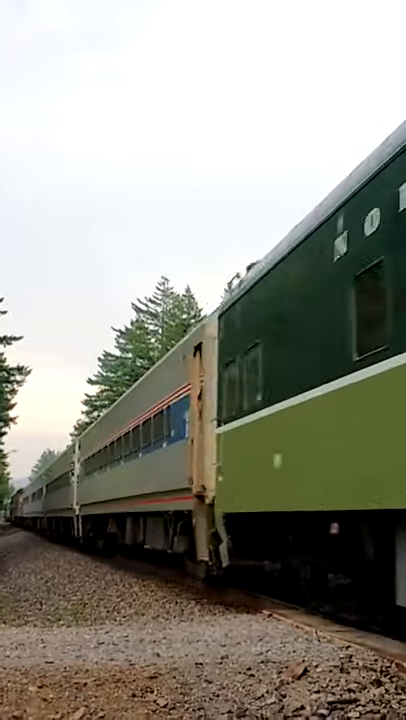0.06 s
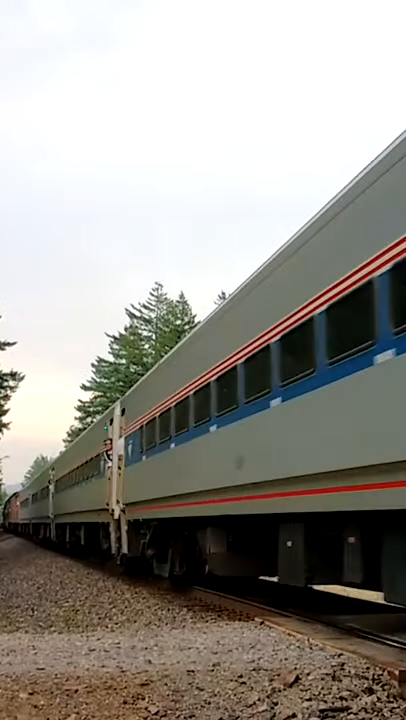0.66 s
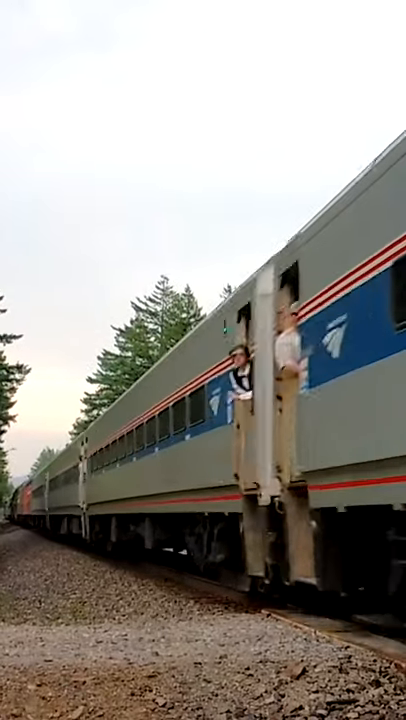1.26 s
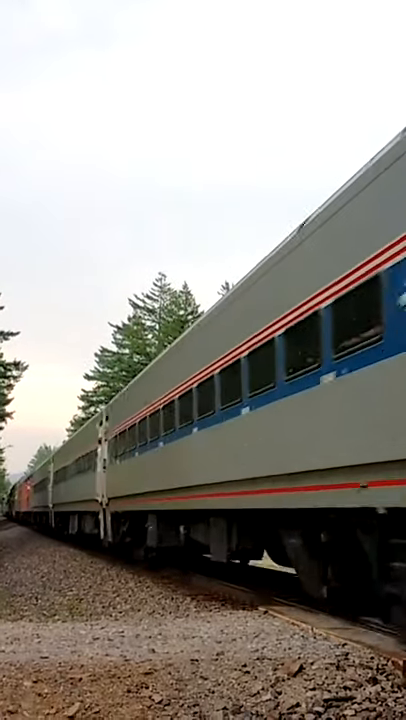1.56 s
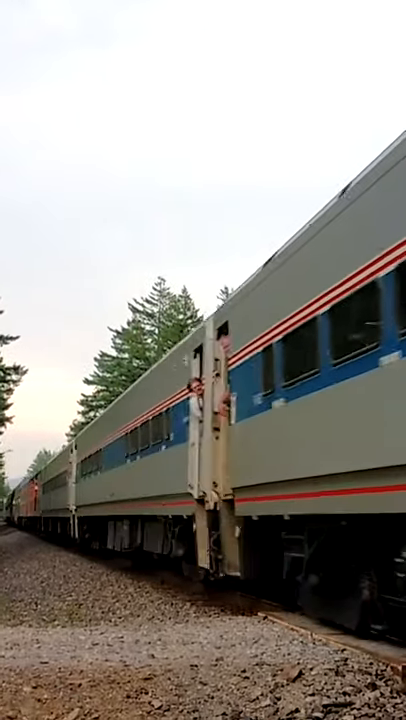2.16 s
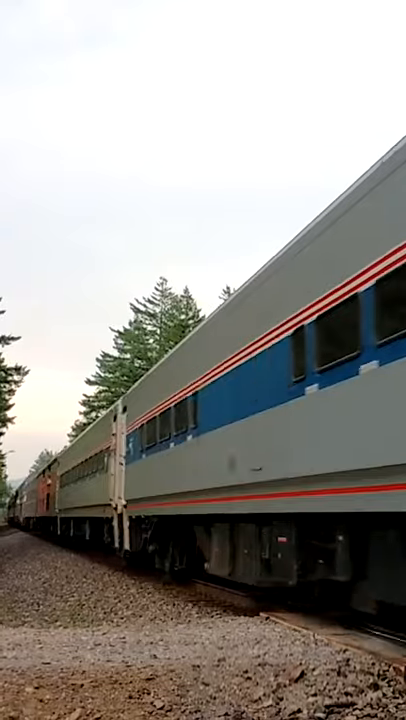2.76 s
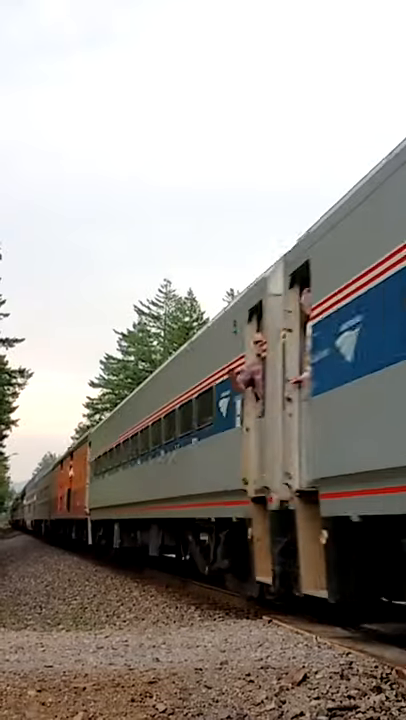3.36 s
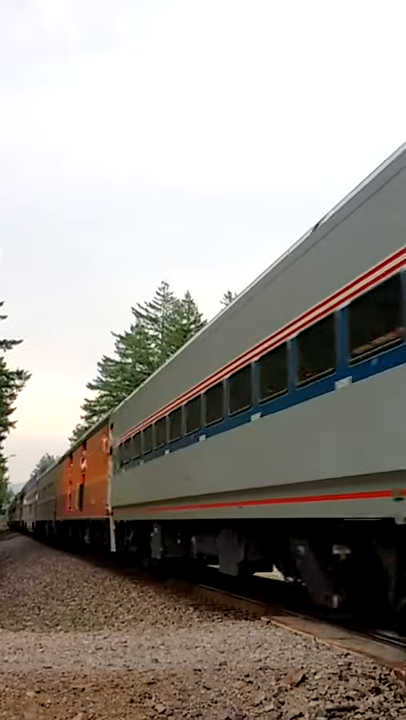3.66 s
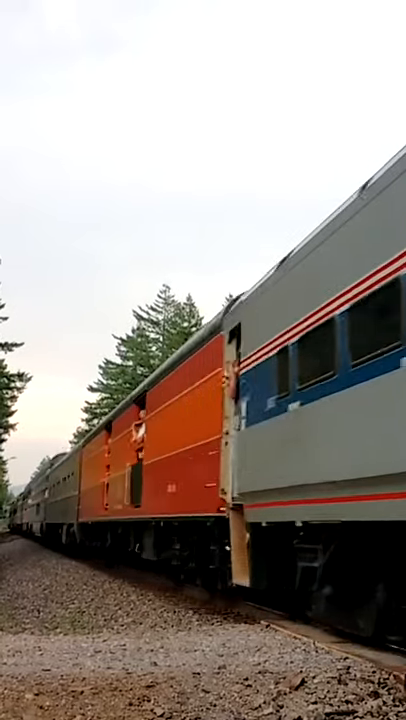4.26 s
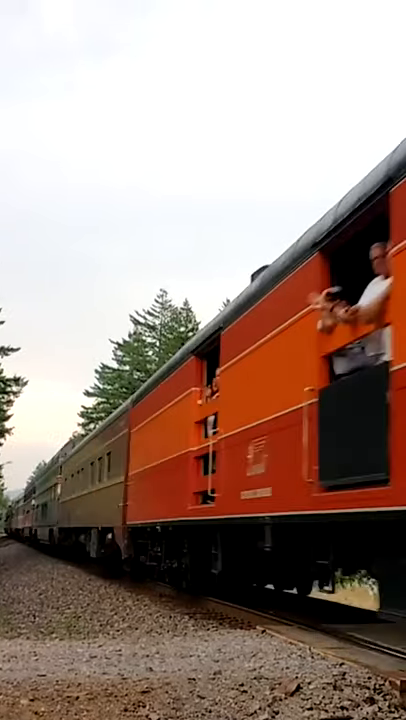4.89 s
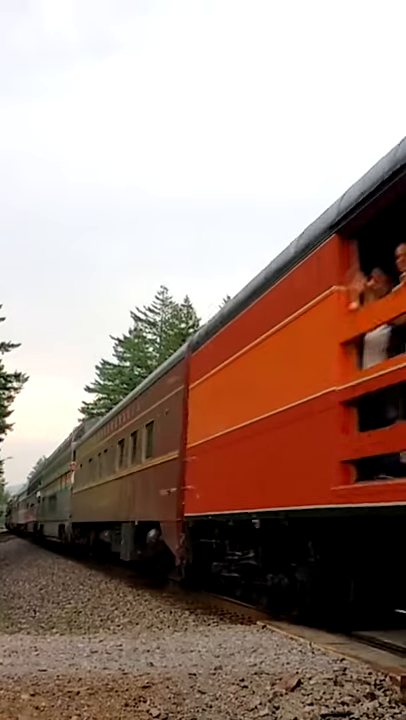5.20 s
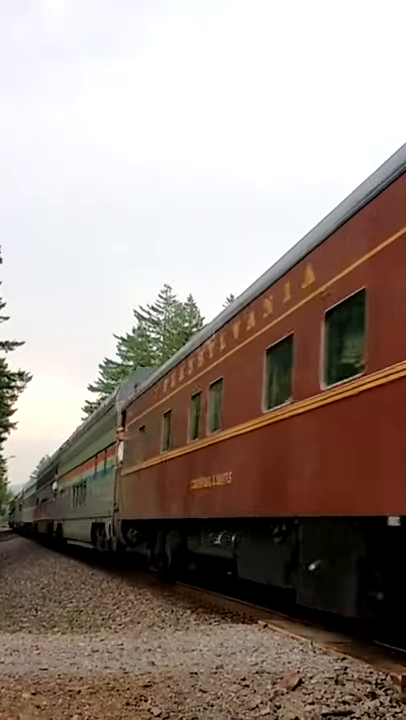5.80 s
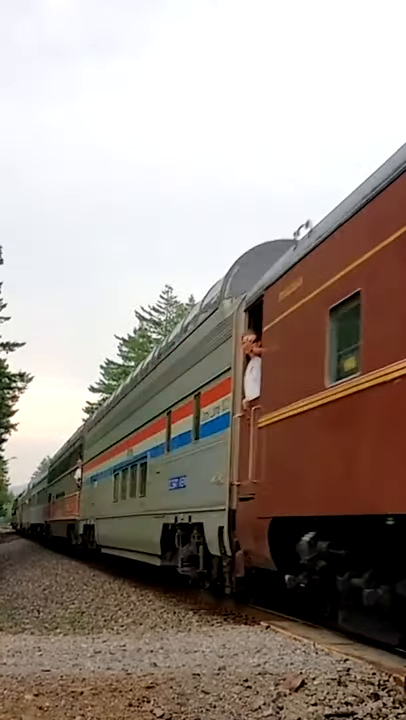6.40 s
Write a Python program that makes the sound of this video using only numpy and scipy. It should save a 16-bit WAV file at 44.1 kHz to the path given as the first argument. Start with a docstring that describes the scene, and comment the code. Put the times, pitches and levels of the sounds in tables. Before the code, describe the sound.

A passenger train rolls past at speed, its wheels rumbling, hissing and clacking over rail joints.

```python
"""Beside a railway track in the open air, a passenger train rolls past a few metres away, at speed.
Rough steel wheels on the rails make a rumble, a roar and a ringing hiss. Axle after axle drops over
the rail joints, thumping bogies and sleepers while loose gear rattles. Flanges squeak, rough treads
grind by and one dry tock sounds under a car. A phone's narrow pair of microphone ports hears it all."""
import sys
import numpy as np
from scipy import signal
from scipy.fft import rfft, irfft, next_fast_len
from scipy.io import wavfile
from scipy.ndimage import uniform_filter1d

SR = 44100
rng = np.random.default_rng(int(sys.argv[2]) if len(sys.argv) > 2 else 0)


def materialize(psi):
    """Save the field psi as 16-bit PCM at rate SR to the path in sys.argv[1].

    A 1-D psi becomes a single channel; in a 2-D psi each row is a channel.
    """
    bounded = np.clip(np.atleast_2d(psi).T, -1, 1)
    quanta = np.round(bounded * 32767).astype(np.int16)
    wavfile.write(sys.argv[1], SR, quanta)


N = 284004
TIME = np.arange(N) / SR


# Fader moves before trims and swells, up under rougher wheels: time_s, rumble_db, roar_db, hiss_db
ROLLING_FADERS = [(0.0, -27.5, -26, -40), (0.21, -27, -18, -35), (0.43, -27.5, -18, -39.5),
                  (1.0, -25, -26, -38), (1.332, -29, -27, -40), (1.5, -30, -26.5, -38.5),
                  (1.791, -26, -26, -38.5), (2.09, -27.5, -28.5, -41.5), (2.45, -27.5, -24.5, -37),
                  (2.76, -25, -24.5, -40.5), (3.13, -25.5, -29.5, -41.5), (3.5, -28, -23.5, -36.5),
                  (3.85, -31.5, -31, -43), (4.18, -29.5, -30.5, -41.5), (4.42, -28.5, -27.5, -39.5),
                  (4.6, -28.5, -25, -39), (4.979, -25.5, -20.5, -41), (5.08, -33, -26.5, -44.5),
                  (5.28, -28, -25, -40.5), (5.45, -25, -20, -35.5), (5.57, -26.5, -19, -36),
                  (5.68, -24.5, -19.5, -39), (5.87, -26, -18, -36.5), (6.2, -29.5, -23, -36),
                  (6.44, -30, -26.5, -34)]
def rolling(shake):
    """Wheel and rail roughness drives four layers; rumble and hiss swell with every bogie."""
    rumble_db, roar_db, hiss_db = faders(ROLLING_FADERS)
    rumble = track_rumble(shake, rumble_db + bogie_swell(after_s=.016, half_s=.13, db=3.6))
    roar = wheel_roar(shake, roar_db)
    hiss = contact_hiss(shake, hiss_db + bogie_swell(after_s=.31, half_s=.1, db=2.7))
    return rumble + roar + hiss + singing_wheels()


# Tone of the shaken track: freq_hz, gain_db
RUMBLE_EQ = [(20, -13), (43, -11), (86, 0), (130, 0), (200, 3), (300, 8), (410, 8), (480, -5.5), (600, -19)]
def track_rumble(shake, fader_db, trim_db=3):
    """The track shakes under the wheels and carries the low end."""
    return unit(colour(rough_noise(shake, share=.063), RUMBLE_EQ)) * undb(fader_db + trim_db)


# Tone of the rolling wheels: freq_hz, gain_db
ROAR_EQ = [(330, -68), (430, 7.5), (490, 4.5), (600, 2), (700, -1.5), (810, -2), (1000, -9), (1300, -16.5),
           (1550, -26.5), (1800, -10.5), (2200, -24.5)]
def wheel_roar(shake, fader_db, trim_db=2):
    """Rough wheels fill the midrange with a roar."""
    return unit(colour(rough_noise(shake, share=.15), ROAR_EQ)) * undb(fader_db + trim_db)


# Tone of the contact patch: freq_hz, gain_db
HISS_EQ = [(1200, 12.5), (1780, 8), (2300, 1.5), (2750, -6.5), (3200, 2), (3700, 2), (4600, -5), (5600, -2),
           (7500, -7), (9500, -13.5), (11500, -25), (13500, -20.5), (15500, -26)]
def contact_hiss(shake, fader_db, trim_db=5.5, top_steadiness=.41, pivot_db=-31):
    """Steel hisses on steel; the top end follows only part of the level's swing about the pivot."""
    level_db = fader_db + trim_db
    hiss = unit(colour(rough_noise(shake, share=.21), HISS_EQ)) * undb(level_db)
    top = signal.sosfiltfilt(signal.butter(2, 8500, "high", fs=SR, output="sos"), hiss)
    top_gain = undb(top_steadiness * (pivot_db - level_db))
    return hiss + top * (top_gain - 1)


# Bogies, two at each coupling, and how hard they hit each joint:
# start_s, joint1_db, joint2_db, joint3_db, joint4_db, extra_crack_db
BOGIE_PASSES = [(-.228, 0, -8.5, 1.5, 0, -6), (.498, -6, 5, -2, -9.5, -11.5), (.811, -1.5, 2, 1, 1, -5),
                (1.538, 0.5, 2, -3.5, -11, -4.5), (1.852, -1, 2.5, -3.5, .5, -4.5),
                (2.58, 0.5, 1.5, -6.5, -11, -4.5), (2.897, -0.5, -1, 0, -0.5, -7),
                (3.625, 0, 1.5, -2, -5, -9.5), (3.941, -0.5, 0, -0.5, -0.5, -5.5),
                (4.667, -1, 3, -2, -31, -10), (5.001, -5.5, -1, -7, -10, 0.5),
                (5.723, -2.5, 4.5, -3.5, -11, -4.5), (6.024, -3, -2, 0, 3, -6.5)]
# Rail joints, crossed in turn:
# delay_s, axle_gap_s, thump_db, knock_db, crack_db, far_side_db, second_axle_db, second_crack_db
RAIL_JOINTS = [(0, .107, -14, -18.5, -28.5, -13.5, 0, -2.5), (.206, 0.069, -26, -27.5, -41, -8, 1.5, 9.5),
               (.268, .102, -24, -20, -27, -6, 4, 3), (.366, 0.092, -32, -28.5, -26.5, 3, 8, -5)]
def axle_blows():
    """Both axles of every bogie strike every joint; yields cues laid out like ACCENT_CLACKS."""
    for start_s, *forces_db, extra_crack_db in BOGIE_PASSES:
        for force_db, joint in zip(forces_db, RAIL_JOINTS):
            delay_s, gap_s, thump_db, knock_db, crack_db, far_db, second_db, second_crack_db = joint
            for axle in (0, 1):
                hit_s = start_s + delay_s + axle * gap_s
                hit_db = force_db + axle * second_db
                edge_db = extra_crack_db + axle * second_crack_db
                yield hit_s, thump_db + hit_db, knock_db + hit_db, crack_db + hit_db + edge_db, far_db


LEAD_S = .014  # a clack's run-up to its snap
# Further wheel clacks, accents on axles striking the joints and single knocks between them:
# start_s, thump_db, knock_db, crack_db, far_side_db
ACCENT_CLACKS = [(0.225, -20.5, -17, -42, -21), (.362, -19.5, -11.5, -29, 2.5),
                 (.470, -18, -16, -30.5, -14), (.545, -29, -20, -35, 4), (.579, -12, -42, -35, -10),
                 (0.602, -23, -24, -34, 0), (0.649, -22, -25, -39, -4), (.684, -20, -33, -47, -16),
                 (1.019, -19.5, -28, -48, -15), (1.39, -43, -29, -50, 11.5), (1.438, -28, -38, -48, -4),
                 (1.738, -31, -22, -45, -6), (1.842, -25, -20, -27.5, 8), (2.197, -26, -40, -48, 18),
                 (2.487, -25, -30, -49, -4), (2.545, -22.5, -23, -31, -12), (2.848, -21, -18.5, -31, -4),
                 (3.207, -24, -29, -32, 6), (3.51, -44, -25, -35, 11.5), (3.69, -20, -31, -36, 4),
                 (4.206, -31, -28, -40, -3), (4.243, -27, -22.5, -36, -13), (4.972, -18, -18.5, -25.5, -13),
                 (5.024, -12.5, -21.5, -36, -20), (5.14, -19.5, -22, -41, -18), (5.238, -27, -27, -36, -3),
                 (5.462, -22.5, -35, -45, -6), (5.633, -20, -16, -32, -3), (5.698, -11, -16, -26.5, -8),
                 (5.720, -32, -15.5, -46, -4), (5.756, -15.5, -24, -48, -13), (5.97, -23, -19, -31.5, -6),
                 (6.049, -16, -19, -27.5, -18), (6.185, -18.5, -28, -30, -11), (6.322, -34, -25, -46, 3)]
def clacks(far_side):
    """The axle rhythm and its accents; on the far side, thump and knock change in weight."""
    out = np.zeros(N + SR)
    for start_s, thump_db, knock_db, crack_db, far_db in [*axle_blows(), *ACCENT_CLACKS]:
        if start_s > LEAD_S:
            side_db = far_db if far_side else 0
            hit = clack(thump_db + side_db, knock_db + side_db, crack_db)
            start = int((start_s - LEAD_S) * SR)
            out[start:start + len(hit)] += hit
    return out[:N]


# Tone of struck steel: freq_hz, gain_db
CRACK_EQ = [(900, -22), (1400, -3), (1870, 11.5), (2200, -1), (2850, 1), (3600, -6.5), (5500, -8),
            (7500, -13.5), (10000, -21), (15500, -32)]
def clack(thump_db, knock_db, crack_db, rise_s=.0026, chatter=.049, rattle=.6, rms_window_s=.038):
    """One blow: the wheel's bounces ring bogie and wheel, the steel snaps and loose gear rattles on."""
    age = np.arange(SR // 6) / SR
    t = age - LEAD_S
    since_snap = np.maximum(t, 0)
    attack = np.exp(np.minimum(t, 0) / rise_s)
    chatter_noise, crack_noise = rng.standard_normal((2, len(t))) * attack
    force = bounces(t) + chatter * chatter_noise * fade(since_snap, t60=.13)
    body = signal.fftconvolve(force, bogie_ring(age))[:len(t)]
    # the bogie is too small to radiate the deepest bass
    body = signal.sosfilt(signal.butter(3, 122, "high", fs=SR, output="sos"), body)
    thump = signal.sosfiltfilt(signal.butter(3, 450, fs=SR, output="sos"), body, padlen=0)
    knock = body - thump
    snap_and_rattle = fade(since_snap, t60=.075) + rattle * fade(since_snap, t60=.24)
    crack = colour(crack_noise * snap_and_rattle, CRACK_EQ)
    clang = signal.fftconvolve(force, wheel_clang(age))[:len(t)]
    parts = (thump, thump_db), (knock, knock_db), (crack, crack_db), (clang, crack_db - 11)
    # each level is the rms the part would have if it lasted rms_window_s
    return sum(x * undb(db) * np.sqrt(rms_window_s * SR / np.sum(x ** 2)) for x, db in parts)


def bounces(t, spacing_s=.0044, early_s=.0012, scatter_db=1.5, jitter=.1):
    """The wheel dips into the gap, hits the next rail and bounces quickly on the springy track."""
    force = np.zeros(len(t))
    for k, size in enumerate([.2, 1, 1, .8, .35, .15], start=-1):
        bounce_s = spacing_s * (k + jitter * rng.standard_normal()) - early_s
        force[np.argmin(abs(t - bounce_s))] += size * undb(scatter_db * rng.standard_normal())
    return force


# Modes of the struck bogie and track: pitch_hz, level_db, t60_s
BOGIE_MODES = [(158, 1, 0.082), (180, 2.5, 0.059), (200.6, 4, 0.028), (264.6, 1.5, 0.055), (340, 3, 0.059),
               (404.5, -1, 0.16), (462, 7, 0.021), (550, 9, 0.015), (746, -7, 0.081), (834, -1.5, 0.024),
               (1057, -15, 0.039), (1336, -14.5, 0.022)]
def bogie_ring(age, detune=.031):
    """The body of a clack: damped modes, with tuning, level and polarity varied at every blow."""
    out = 0
    for hz, db, t60 in BOGIE_MODES:
        gain = rng.choice([-1, 1]) * undb(db + rng.standard_normal())
        pitch_hz = hz * (1 + detune * rng.standard_normal())
        out = out + gain * fade(age, t60) * np.sin(2 * np.pi * pitch_hz * age)
    return out


# Wheel modes that clang when struck and sing while rolling: pitch_hz, width_hz, level_db
WHEEL_MODES = [(1870, 58, -0.5), (2580, 250, -1), (2816, 240, -1.5), (4480, 440, -6.5)]
def wheel_clang(age, t60=.16, detune=.0386):
    """A blow sets the wheel's modes clanging; energy 1."""
    out = 0
    for hz, _, db in WHEEL_MODES:
        pitch_hz = hz * (1 + detune * rng.standard_normal())
        out = out + undb(db) * fade(age, t60) * np.sin(2 * np.pi * pitch_hz * age)
    return out / np.sqrt(np.sum(out ** 2))


# Fader moves of the singing wheels, before the trim: time_s, level_db
SINGING_FADER = [(0.0, -38), (0.38, -41), (0.77, -39), (1.04, -37.5), (1.25, -39.5), (1.76, -38.5),
                 (2.25, -41), (2.53, -43), (3.2, -41), (3.46, -40.5), (3.91, -44), (4.22, -41),
                 (4.39, -45.5), (4.65, -40.5), (5.07, -43.5), (6.12, -40), (6.44, -39)]
def singing_wheels(trim_db=-2.5, wander_db=3.04):
    """Rolling keeps the modes ringing; each wheel sings a little differently, so they come and go."""
    ring = sum(noise_band(hz, width_hz) * undb(db + wander_db * walk(30))
               for hz, width_hz, db in WHEEL_MODES)
    return ring * undb(faders(SINGING_FADER)[0] + trim_db)


# Flanges grazing the rail: peak_s, pitch_hz, level_db, half_length_s
FLANGE_SQUEAKS = [(0.384, 4560, -34.5, 0.021), (.45, 2480, -36.5, 0.046), (1.182, 2910, -33, 0.016),
                  (1.285, 2754, -40, 0.032), (2.968, 2620, -40, .014), (3.062, 2750, -35, 0.032),
                  (3.58, 4780, -38, 0.018), (3.595, 2880, -35.5, 0.038), (3.785, 2770, -38, .018),
                  (4.155, 2607, -40, 0.027), (5.872, 2720, -32, 0.018)]
def flange_squeaks(waver_share=.013, flutter_db=3.5, sink_share_per_s=.6):
    """A flange touches the rail and one wheel mode flares roughly, sinking in pitch as it passes."""
    out = np.zeros(N)
    waver = waver_share * walk(400)
    flutter = unit(undb(flutter_db * walk(220)))
    for peak_s, hz, db, half_s in FLANGE_SQUEAKS:
        near = abs(TIME - peak_s) < .15
        pitch_hz = hz * (1 - sink_share_per_s * (TIME[near] - peak_s) + waver[near])
        tone = np.sqrt(2) * np.sin(2 * np.pi * np.cumsum(pitch_hz) / SR)
        out[near] += tone * undb(db) * hump(peak_s, half_s)[near] * flutter[near]
    return out


# Rough treads going by: peak_s, half_length_s, centre_hz, width_hz, level_db
TREAD_GRINDS = [(.3, 0.097, 1045, 600, -28), (0.426, 0.13, 522, 450, -28.5), (5.68, 0.1, 1000, 800, -23),
                (5.7, 0.057, 480, 450, -21), (6.25, 0.41, 4440, 649.6, -41.5)]
def grinding_treads():
    """A rough tread swells as it comes close, grinding on the rail in a band of gritty noise."""
    out = 0
    for peak_s, half_s, hz, width_hz, db in TREAD_GRINDS:
        grit = np.sqrt(jolts(per_s=260, spread_db=3, t60=.02))
        out = out + noise_band(hz, width_hz) * grit * undb(db) * hump(peak_s, half_s)
    return out


def tock(start_s=2.199, pitch_hz=1050, level_db=-11, t60=.018):
    """One short, dry tock from under a car."""
    age = np.maximum(TIME - start_s, 0)
    return undb(level_db) * fade(age, t60) * np.sin(2 * np.pi * pitch_hz * age)


# Stereo image of the two ports: freq_hz, left_gain_db, left_lead_rad, far_vs_direct_db
PORT_IMAGE = [(43, 0, -.35, 5), (86, -.5, -.45, 3), (130, -8, -1.2, 0), (170, -10, -1.2, -7),
              (215, -15, -1.5, -10), (300, -13, -1.5, -11), (430, -13, -1.1, -11), (600, -13, -.5, -9),
              (800, -8, -.1, -6), (1050, 0, 0, -13), (1400, -2, .1, -5), (1700, -5, 0, -5),
              (2200, 0, 0, -13), (9000, 0, 0, -10)]
def microphone_ports(direct, scattered, lag_s=.00056):
    """Each channel is one port minus the delayed other: sound crosses over late and inverted."""
    size = next_fast_len(N + 2048)
    left_db, lead_rad, far_db = over_hz(PORT_IMAGE, size)
    crossfeed = -np.exp(-2j * np.pi * np.fft.rfftfreq(size, 1 / SR) * lag_s)
    near = rfft(direct, size)
    far = rfft(scattered, size) * undb(far_db)
    left = near * crossfeed * undb(left_db) * np.exp(1j * lead_rad) + far
    right = near + far * crossfeed
    return irfft(np.array([left, right]) / np.sqrt(1 + undb(far_db) ** 2), size)[:, :N]


def bogie_swell(after_s, half_s, db):
    """A lift in dB as each bogie goes by, peaking after_s behind its cue at the first joint."""
    return db * sum(hump(start_s + after_s, half_s) for start_s, *_ in BOGIE_PASSES)


def noise_band(hz, width_hz, drift=.019):
    """A resonance kept ringing by noise, its pitch drifting; rms 1."""
    drive = rng.standard_normal(N) + 1j * rng.standard_normal(N)
    envelope = signal.sosfilt(signal.butter(2, width_hz / 2, fs=SR, output="sos"), drive)
    phase = 2 * np.pi * np.cumsum(hz * (1 + drift * walk(10))) / SR
    return unit((envelope * np.exp(1j * phase)).real)


def jolts(per_s, spread_db, t60):
    """Power of many small random jolts, each dying away; mean 1."""
    hits = rng.random(N) < per_s / SR
    strength = undb(spread_db * np.clip(rng.standard_normal(N), -2, 2))
    decay = np.exp(-2 * np.log(1000) / (t60 * SR))
    power = signal.lfilter([1], [1, -decay], hits * strength ** 2)
    return power / power.mean()


def rough_noise(shake, share):
    """Noise with a share of its power arriving in jolts."""
    return rng.standard_normal(N) * np.sqrt(1 - share + share * shake)


def walk(rate_hz):
    """Random sample-and-hold, smoothed twice; rms 1."""
    held = rng.standard_normal(2048)[(TIME * rate_hz).astype(int) % 2048]
    step = int(SR / rate_hz)
    return unit(uniform_filter1d(uniform_filter1d(held, step), step // 2))


def colour(x, eq):
    """Shape x with an EQ curve, rolling off beyond both ends."""
    size = next_fast_len(len(x))
    hz = np.fft.rfftfreq(size, 1 / SR) + 1
    rolloff = 1 / (1 + (eq[0][0] / hz) ** 4) / (1 + (hz / eq[-1][0] / 2) ** 4)
    return irfft(rfft(x, size) * undb(over_hz(eq, size)[0]) * rolloff, size)[:len(x)]


def over_hz(table, size):
    """A frequency table's columns as curves over the bins of a spectrum."""
    hz, *columns = np.transpose(table)
    log_bins = np.log(np.fft.rfftfreq(size, 1 / SR) + 1)
    return [np.interp(log_bins, np.log(hz), column) for column in columns]


def faders(table):
    """A time table's columns as curves over the scene."""
    time_s, *columns = np.transpose(table)
    return [np.interp(TIME, time_s, column) for column in columns]


def hump(peak_s, half_s):
    """A bell-shaped rise and fall."""
    return np.exp(-((TIME - peak_s) / half_s) ** 2)


def fade(t, t60):
    """A tail dying by 60 dB in t60 seconds."""
    return np.exp(-np.log(1000) * t / t60)


def undb(db):
    """Decibels to gain."""
    return 10 ** (np.asarray(db) / 20)


def unit(x):
    """Scale to rms 1."""
    return x / np.sqrt(np.mean(x ** 2))


def scene():
    """The train is heard directly and, scattered by ballast and car sides, from the far side too."""
    shake = jolts(per_s=60, spread_db=1.5, t60=.06)
    direct = rolling(shake) + clacks(far_side=False) + flange_squeaks() + grinding_treads() + tock()
    scattered = rolling(shake) + clacks(far_side=True)
    return microphone_ports(direct, scattered)


def record(dry, top_hz=15450):
    """The phone rounds off the highest peaks and cuts the top."""
    rounded = dry / (1 + dry ** 6) ** (1 / 6)
    return signal.sosfilt(signal.ellip(10, .1, 80, top_hz, fs=SR, output="sos"), rounded)


dry = scene()
out = record(dry)
materialize(out)
```